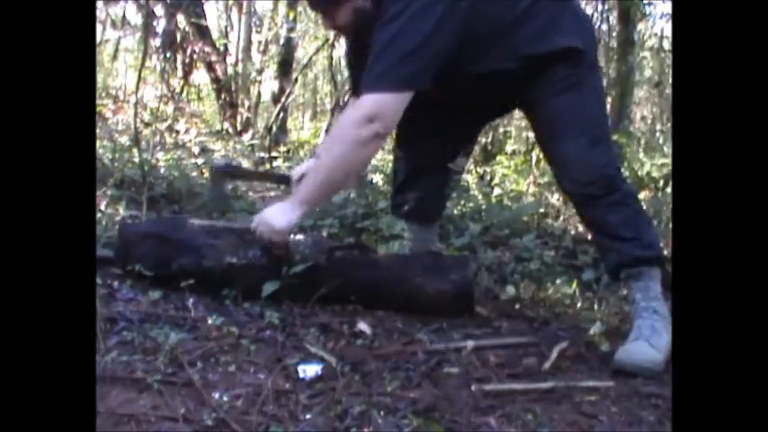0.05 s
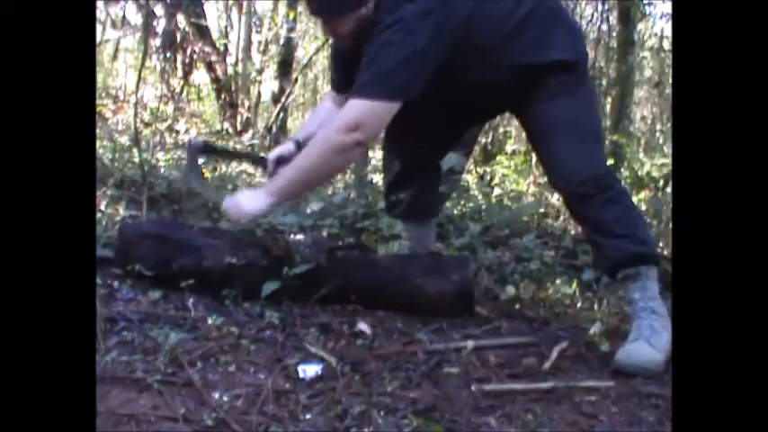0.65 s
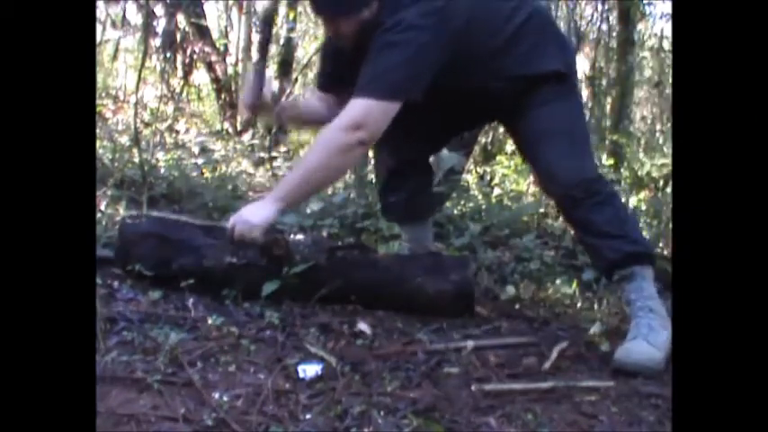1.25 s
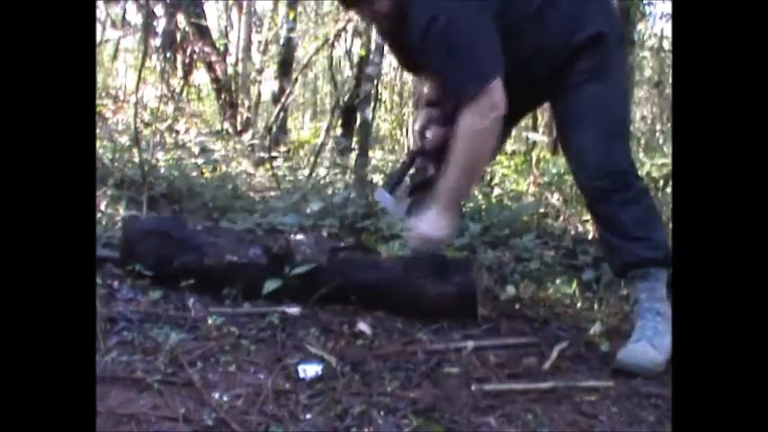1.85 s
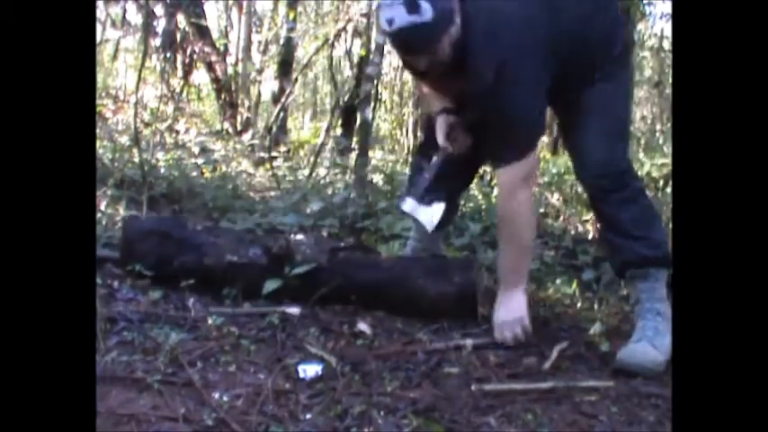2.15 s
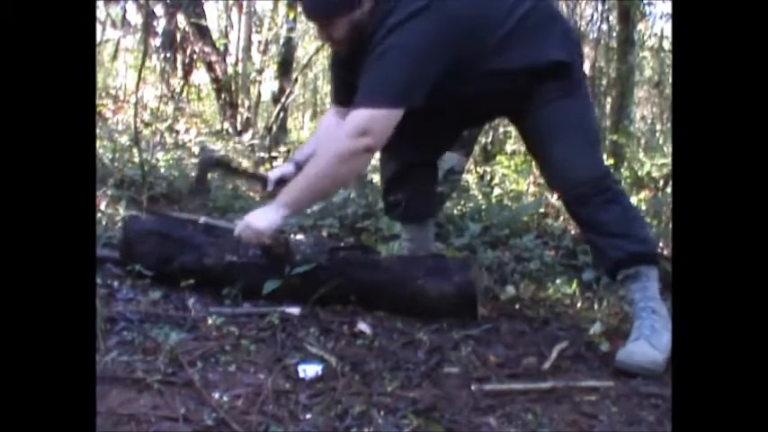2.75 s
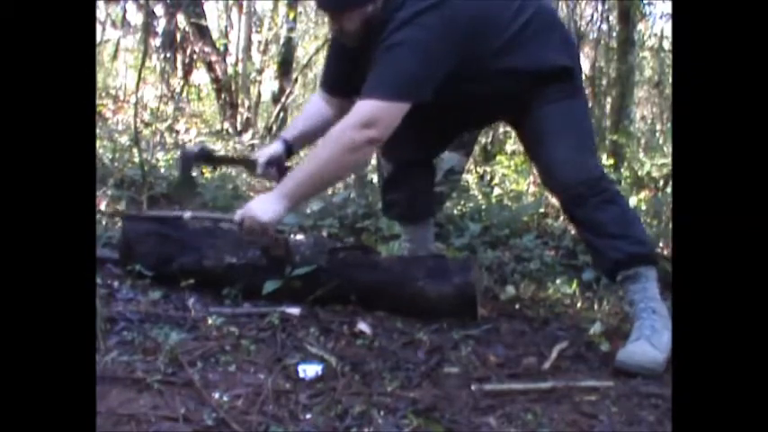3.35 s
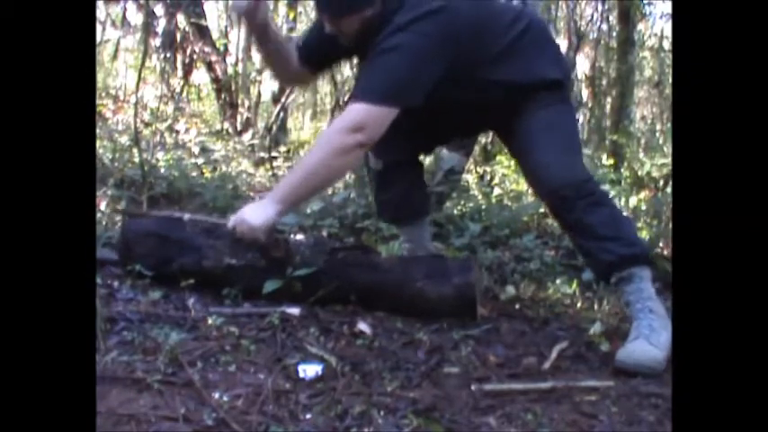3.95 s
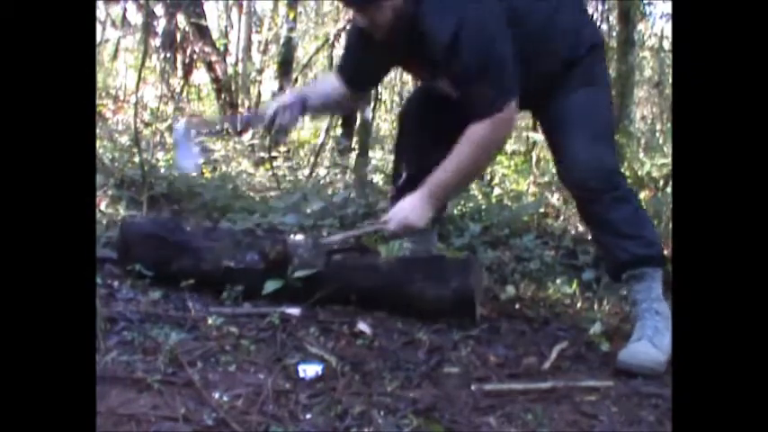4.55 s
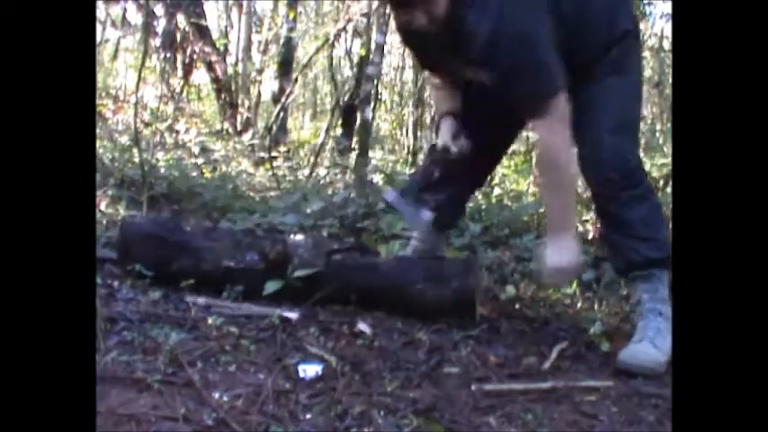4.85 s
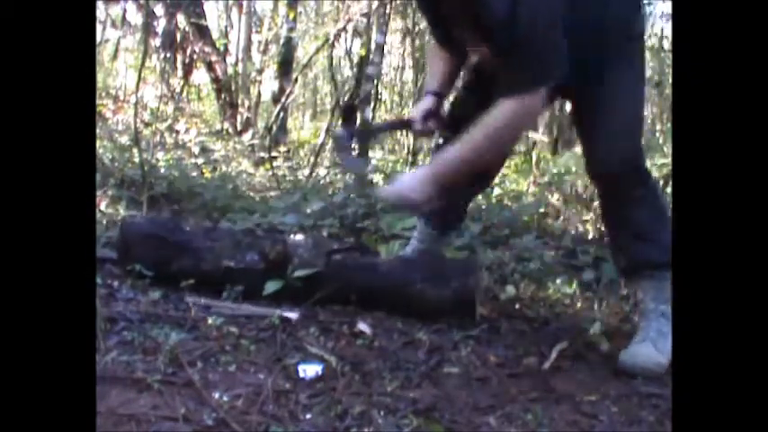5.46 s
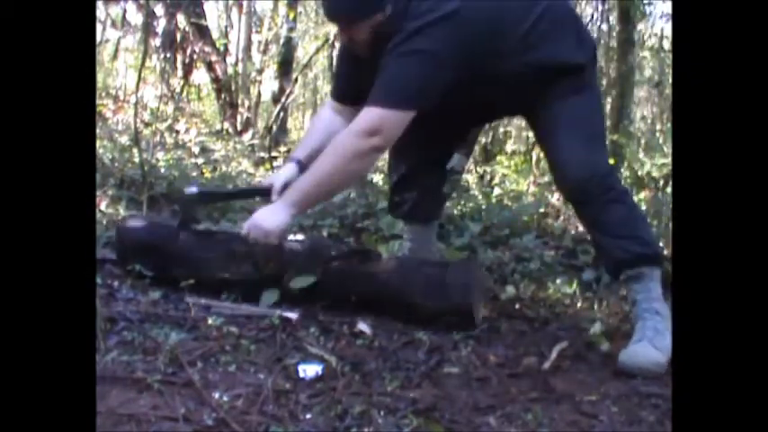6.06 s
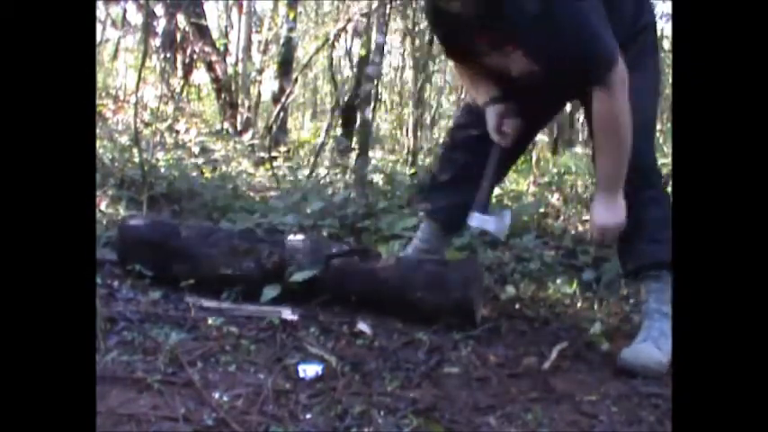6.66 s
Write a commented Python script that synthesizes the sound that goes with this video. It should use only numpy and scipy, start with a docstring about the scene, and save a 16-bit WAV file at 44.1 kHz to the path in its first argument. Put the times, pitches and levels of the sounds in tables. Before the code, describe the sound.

A hatchet cuts thin sticks on a log in a forest, a few metres from a stereo microphone. Two sharp cracks come first, then a pause with leaves brushed underfoot, then three quicker blows, a tiny squeak of green wood, and a last chop followed by a clacking piece. Each blow carries a short woody knock. Light taps fall in between, over a steady hush of trees and a far rumble.

```python
"""Chopping sticks in a forest

A hatchet cuts thin sticks to length on a log, a few metres from a camera's stereo microphone.
Each blow cracks the stick, bites through and rings the log; some sticks squeak as they tear free.
Between blows come light taps, the clack of cut pieces, and hand and boots brushing the leaves.
Litter and trunks scatter the woodwork, over a steady hush of trees and a far rumble."""
import sys
import numpy as np
from scipy import signal
from scipy.fft import rfft, irfft, next_fast_len
from scipy.io import wavfile

SR = 44100
rng = np.random.default_rng(int(sys.argv[2]) if len(sys.argv) > 2 else 0)


def output_pcm(signal):
    """Save a mono or channel-first signal as 16-bit PCM at the path in sys.argv[1].

    Samples are clipped to [-1, 1] before scaling.
    """
    pcm = np.clip(np.atleast_2d(signal).T, -1, 1) * 32767
    wavfile.write(sys.argv[1], SR, np.round(pcm).astype(np.int16))


N = 296484

# hatchet blows and the piece each cuts off:
# start_s, strength_db, cut_s, tilt_db_per_octave, piece_db, first_mode_hz, second_mode_hz
BLOWS = [(0.6230, -7.5, 0.003, 2, -12, 3940, 6120), (1.3950, 1, 0.0027, 5, -12.5, 2250, 7620),
         (3.1569, -6, 0.0011, 1.5, -19, 2390, 6570), (3.7210, -0.5, 0.0011, -1, -16.5, 6200, 9140),
         (4.1239, 4, 0.002555, -3, -20.5, 2240, 6000), (6.0539, 0, 0.00236, -1, -11, 2220, 11740)]
# light touches of blade or stick on the log: start_s, level_db, sharpness_db
TAPS = [(0.0425, -51.5, 0), (0.3347, -58, 4.5), (0.9783, -56.5, 6), (0.9853, -53, -1.5), (1.8630, -55, 6.5),
        (2.7137, -52.5, -5), (2.8801, -42, -2), (3.1772, -40, 0), (3.4500, -49.5, -1.5),
        (3.8039, -42, -2.5), (4.2304, -48, 2.5), (4.8185, -49, 1), (6.2468, -47, -4)]
# green wood tearing free: start_s, level_db, length_s, first_pitch_hz, roughness (0-1)
SQUEAKS = [(1.431, -30.5, 0.015, 1972, 0.6), (4.505, -12.5, .0098, 2850, 0.04),
           (6.2545, -31.5, 0.011, 2340, 0.42)]
# loose pieces knocking: start_s, level_db, first_mode_hz, second_mode_hz, second_over_first_db
CLACKS = [(0.043, -36.5, 900, 1340, -4), (3.177, -27, 6950, 6000, -4), (4.58, -33.5, 4000, 7900, 7.5),
          (4.8252, -37.5, 2160, 5150, 2), (6.5084, -25.5, 3230, 5860, 11), (6.514, -28, 3230, 5900, -25)]
# hand and boots in the litter: start_s, leaves_db, thud_db
SCUFFS = [(1.73, -48.5, -69), (1.843, -52.5, -53.5), (4.221, -66, -52), (4.379, -48, -64),
          (4.805, -50, -53.5)]
# how the log and the stick on it ring: pitch_hz, level_db, t60_s
LOG_MODES = [(276, -25, 0.058), (425, -19.5, 0.074), (551, -5.5, 0.079), (557, -2, 0.067), (635, -6, 0.039),
             (749, -9.5, 0.041), (1258, -7, 0.046)]
STICK_MODES = [(733, -11, 0.016), (1042, -14.5, 0.035), (1234, -8, 0.042), (1480, -9, 0.021),
               (2004, -4, 0.019), (2203, -9.5, 0.025), (3110, 1.5, 0.0056), (3630, -8, 0.0065)]
# spectra: frequency_hz, level_db
CRACK_SPECTRUM = [(40, -28), (300, -23.5), (1200, -17), (2800, -6.5), (4000, 4.5), (4900, -1), (6200, 3),
                  (7000, 3.5), (8200, 3.5), (10200, -4), (12500, -1), (16000, -7)]  # snapping fibres
SCATTER_SPECTRUM = [(30, -30), (150, -32), (450, -4), (900, -0.5), (1250, 2.5), (1600, 2), (2200, 6),
                    (3000, 5), (4000, 4.5), (5200, 1.5), (7500, 3.5), (10000, 0.5), (11800, 1.5),
                    (16000, -4)]  # echoes from litter and stems
GREEN_WOOD_SPECTRUM = [(1500, -40), (2700, -21), (3400, -10), (4150, 3), (5100, -5), (6200, 1.5),
                       (7000, -1.5), (8200, -1.5), (10000, -35), (12500, -16), (16000, -30)]  # resonances that shape a squeak
LEAF_SPECTRUM = [(500, -8), (3000, -5), (8000, -3), (15000, -6)]  # brushed leaves
EARTH_SPECTRUM = [(60, -14), (200, -16), (360, -2), (600, -11), (1500, -29)]  # a thud on the ground
FOREST_SPECTRUM = [(15, -50), (25, -30), (70, -12.5), (123, -3.5), (170, -4), (212, -3.5), (344, -14),
                   (624, -13), (818, -12), (962, -11.5), (1370, -10), (2690, -12.5), (5430, -19.5),
                   (13600, -28), (16000, -30)]  # far rumble and hush of trees
# how alike the forest bed is in the two channels: frequency_hz, correlation (0-1)
FOREST_LIKENESS = [(30, 0.76), (70, 0.91), (160, 0.99), (290, 0.8), (640, 0.19), (1400, 0.023),
                   (15000, 0.019)]
# which way the forest bed leans: frequency_hz, left_over_right_db
FOREST_BALANCE = [(100, 0.5), (600, -.3), (1300, -1.5), (2400, -3), (4400, -1.5), (9000, -0.5)]
# phase between the microphone ports: frequency_hz, left_lead_rad
LEFT_LEAD = [(100, 0.057), (600, 0.095), (1460, 0.73), (2700, 0.68), (5000, 0.22), (12000, 0.26)]

TOP_HZ = 16000  # the camera's band limit
T = np.arange(SR // 2) / SR  # seconds since a contact


def amp(db):
    """Decibels as a gain."""
    return 10 ** (np.asarray(db) / 20)


def unit(x):
    """x scaled to rms 1."""
    return x / np.sqrt(np.mean(x ** 2) + 1e-20)


def along(points, hz):
    """A curve of (frequency_hz, value) points, read on a log axis."""
    frequencies, values = np.transpose(points)
    return np.interp(np.log(hz + 1), np.log(frequencies + 1), values)


def filtered(x, response):
    """x through a frequency response."""
    n = x.shape[-1]
    padded = next_fast_len(n + SR // 8)
    return irfft(rfft(x, padded) * response(np.fft.rfftfreq(padded, 1 / SR)), padded)[..., :n]


def noise(spectrum, shape, tilt_db=0):
    """Coloured noise of rms 1, tilted by tilt_db per octave above 800 Hz."""
    colour = lambda hz: amp(along(spectrum, hz) + tilt_db * np.log2(np.maximum(hz, 800)))
    return unit(filtered(rng.standard_normal(shape), colour))


def add(track, start_s, sound):
    """Mix a sound in from start_s."""
    part = track[..., round(start_s * SR):][..., :len(T)]
    part += sound[..., :part.shape[-1]]


def gate(length_s, rise_s):
    """Opens quickly, holds, and closes at length_s."""
    return (1 - np.exp(-T / rise_s)) / (1 + (T / length_s) ** 20)


def forest():
    """The bed: a far rumble near the centre, under the wide hush of the trees."""
    width = lambda hz: np.arccos(np.clip(along(FOREST_LIKENESS, hz), -1, 1)) / 2
    spread = lambda hz: np.array([np.cos(width(hz)), np.sin(width(hz))])
    lean = lambda hz: amp(np.outer([.5, -.5], along(FOREST_BALANCE, hz)))
    mid, side = filtered(noise(FOREST_SPECTRUM, (2, N)), spread)
    return amp(-50) * unit(filtered(np.array([mid + side, mid - side]), lean))


def taps():
    """Light touches wake stick and log: a sharp one ticks, a blunt one knocks."""
    out = np.zeros((2, N))
    for start_s, level_db, sharp_db in TAPS:
        tick = amp(sharp_db) * crack(length_s=0.0032, tilt_db=-2)
        stick = amp(6.5) * ring(STICK_MODES, attack_s=0.00031)
        knock = amp(-sharp_db) * log_knock(attack_s=0.002)
        tap = amp(level_db) * (tick + stick + knock)
        add(out, start_s, outdoors(tap, wet_db=-19, echo_db=-24, echo_s=.009))
    return out


def crack(length_s, tilt_db):
    """Fibres snap in a tight volley, of rms about 1 over its length."""
    volley = noise(CRACK_SPECTRUM, len(T), tilt_db) * gate(length_s, rise_s=0.00033)
    return volley * np.sqrt(length_s * SR / np.sum(volley ** 2))


def ring(modes, attack_s, vary_db=0.0):
    """Struck wood rings in damped modes, a little different at each contact."""
    hz, level_db, t60_s = np.transpose(modes)[..., None]
    size, detune, phase = rng.standard_normal((3, len(modes), 1))
    waves = np.sin(2 * np.pi * hz * (1 + .009 * detune) * T + .5 * phase)
    decays = amp(level_db + vary_db * size - 60 * T / t60_s)
    return (decays * waves).sum(0) * (1 - np.exp(-T / attack_s))


def log_knock(attack_s):
    """The log swells into its ring; its deep bass below about 170 Hz is cut away."""
    low_cut = signal.butter(2, 170, "highpass", fs=SR, output="sos")
    return signal.sosfilt(low_cut, ring(LOG_MODES, attack_s, vary_db=2))


def outdoors(x, wet_db, echo_db, echo_s):
    """A small sound at the microphone: direct, off a near surface, and scattered."""
    echo = filtered(x, lambda hz: np.exp(-2j * np.pi * hz * echo_s))
    return placed(x + amp(echo_db) * echo, left_db=3.0) + amp(wet_db) * scattered(x)


def placed(x, left_db):
    """A source a little left of the microphone's axis."""
    return x * amp([[left_db / 2], [-left_db / 2]])


def scattered(x):
    """What the forest floor and the stems send back of a sound."""
    tail = scatter(t60_s=0.1, rise_s=0.0016, far_db=-18, far_t60_s=0.61)
    return signal.fftconvolve(x[None], tail / np.linalg.norm(tail[0]), axes=1)[:, :len(x)]


def scatter(t60_s, rise_s, far_db, far_t60_s, tilt_db=0):
    """Countless faint echoes from litter and stems, different in each channel; far trunks linger."""
    fade = amp(-60 * T / t60_s) + amp(far_db - 60 * T / far_t60_s)
    onset = 1 - np.exp(-(T / rise_s) ** 2)
    return noise(SCATTER_SPECTRUM, (2, len(T)), tilt_db) * fade * onset


def clacks():
    """Short pieces ring in two bending modes, soon damped by what they touch."""
    out = np.zeros((2, N))
    for start_s, level_db, first_hz, second_hz, second_db in CLACKS:
        tone = ring([(first_hz, 0, 0.034), (second_hz, second_db, 0.023)], attack_s=0.00087, vary_db=6)
        tick = amp(second_db - 18) * crack(length_s=0.0018, tilt_db=-5.5)
        piece = amp(level_db) * choked(tone + tick, contact_s=.003, left_over_db=-11)
        add(out, start_s, outdoors(piece, wet_db=-10, echo_db=-27, echo_s=.013))
    return out


def choked(x, contact_s, left_over_db):
    """Wood rings fully while it is driven; pinned against the log, little is left."""
    floor = amp(left_over_db)
    return x * (floor + (1 - floor) / (1 + (T / contact_s) ** 10))


def chops():
    """The edge cracks the stick, bites through and sets the log and the cut piece ringing."""
    out = np.zeros((2, N))
    for start_s, strength_db, cut_s, tilt_db, piece_db, first_hz, second_hz in BLOWS:
        stretch = cut_s / .002  # against a typical 2 ms cut
        through_s = start_s + 0.726 * cut_s
        # a longer cut spreads the crack thinner
        snap = amp(-18.5 + 0.17 * strength_db) / np.sqrt(stretch) * crack(cut_s, tilt_db)
        add(out, start_s, placed(snap, left_db=3.2))
        piece = ring([(first_hz, 0, .03), (second_hz, -.5, .02)], attack_s=0.0016, vary_db=3.4)
        piece = amp(piece_db) * choked(piece, contact_s=0.0039, left_over_db=-14)
        add(out, start_s, outdoors(piece, wet_db=-16, echo_db=-26, echo_s=.009))
        # a thinner, higher-pitched stick gives less body
        bite_db = -12 - 7.5 * np.log2(first_hz / 2200)
        stick = ring(STICK_MODES, attack_s=0.00046)
        bite = amp(bite_db) * choked(stick, contact_s=0.0035, left_over_db=-8)
        add(out, through_s, outdoors(bite, wet_db=-10, echo_db=-19, echo_s=0.005))
        # what a strong snap or a long cut takes from the blade, the log does not get
        knock_db = -23.5 - .75 * strength_db - 7 * np.log2(stretch)
        knock = amp(knock_db) * log_knock(attack_s=0.009)
        add(out, through_s, placed(knock, left_db=2.0) + amp(-10.5) * scattered(knock))
        earth_thud = amp(-50.5 - 60 * T / 0.093) * noise(EARTH_SPECTRUM, len(T))
        add(out, through_s, earth_thud)
        # the litter underfoot answers at once, the undergrowth behind 13 ms later
        litter = scatter(t60_s=0.15, rise_s=0.0006, far_db=-18, far_t60_s=0.52, tilt_db=.7)
        undergrowth = scatter(t60_s=0.15, rise_s=0.0026, far_db=-25, far_t60_s=0.71, tilt_db=4.8)
        add(out, start_s, amp(strength_db - 28) * litter)
        add(out, start_s + 0.013, amp(strength_db - 33.5) * undergrowth)
    return out


def squeaks():
    """Wet fibres stick and slip ever faster as a piece tears off: a tiny rising squeal with a rasp."""
    out = np.zeros((2, N))
    harmonic = np.arange(1, 8)[:, None]
    last_pitch_hz = 4157
    for start_s, level_db, length_s, first_hz, roughness in SQUEAKS:
        glide = np.minimum(T / (0.88 * length_s), 1)
        pitch_hz = first_hz + (last_pitch_hz - first_hz) * np.sin(np.pi / 2 * glide) ** 2
        partial_hz = harmonic * pitch_hz
        partial_db = along(GREEN_WOOD_SPECTRUM, partial_hz) + 1.5 * np.log2(harmonic)
        waves = np.sin(2 * np.pi * harmonic * np.cumsum(pitch_hz) / SR)
        tone = unit((amp(partial_db) * (partial_hz < TOP_HZ) * waves).sum(0))
        rasp = noise(CRACK_SPECTRUM, len(T), tilt_db=0.5)
        rasp_share = np.clip(2 * roughness * (1 - 0.3 * glide), 0, 1)
        squeal = np.sqrt(1 - rasp_share) * tone + np.sqrt(rasp_share) * rasp
        squeal *= amp(level_db) * gate(length_s, rise_s=0.00085)
        add(out, start_s, outdoors(squeal, wet_db=-17.5, echo_db=-17.5, echo_s=0.011))
    return out


def scuffs():
    """Hand and boots brush the litter: a short swish of leaves over a dull push on the earth."""
    out = np.zeros((2, N))
    peak_s = 0.0125
    swell = T / peak_s * np.exp(1 - T / peak_s)
    for start_s, leaves_db, thud_db in SCUFFS:
        swish = amp(leaves_db) * noise(LEAF_SPECTRUM, (2, len(T)))
        thud = amp(thud_db) * noise(EARTH_SPECTRUM, len(T))
        add(out, start_s, swell * (swish + thud))
    return out


def scene():
    """The work at the log, a few metres off, over the forest bed."""
    return chops() + taps() + squeaks() + clacks() + scuffs() + forest()


def record(dry):
    """The camera's microphone hears the left a little earlier; the treble stops at the band limit."""
    ports = filtered(dry, lambda hz: np.exp(1j * np.outer([.5, -.5], along(LEFT_LEAD, hz))))
    return filtered(ports, lambda hz: 1 / (1 + (hz / TOP_HZ) ** 160))


dry = scene()
out = record(dry)
output_pcm(out)
```